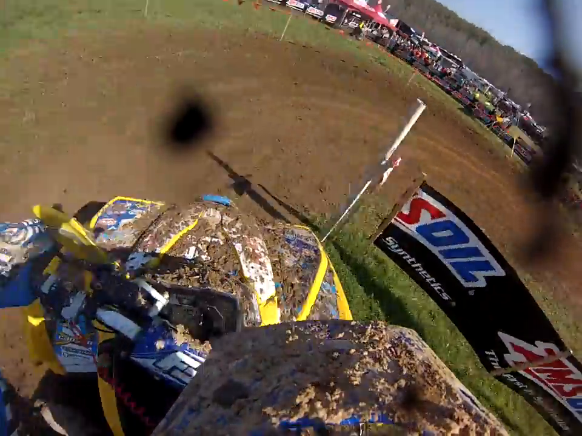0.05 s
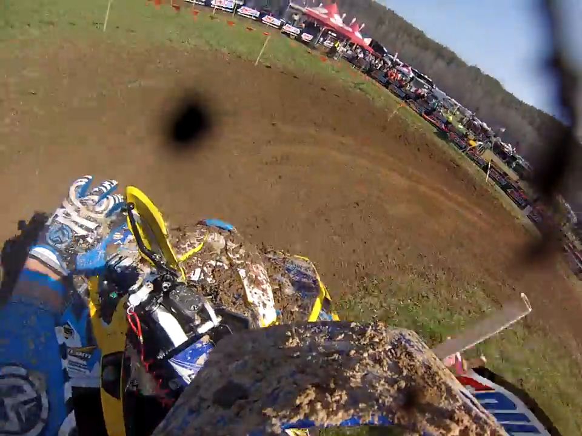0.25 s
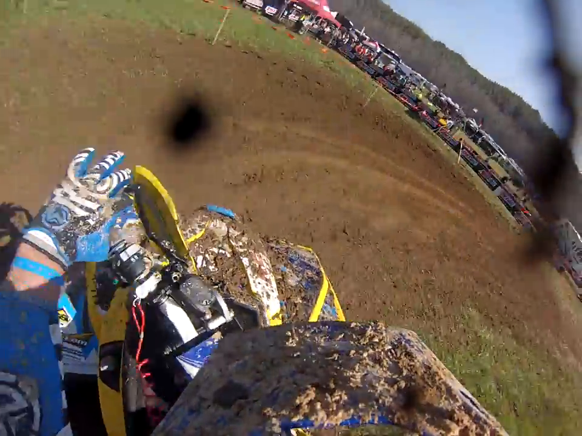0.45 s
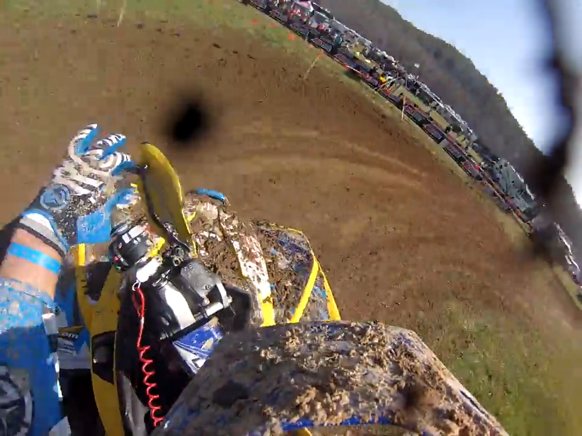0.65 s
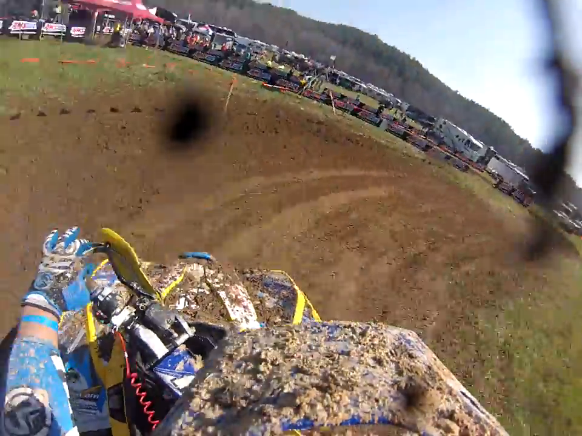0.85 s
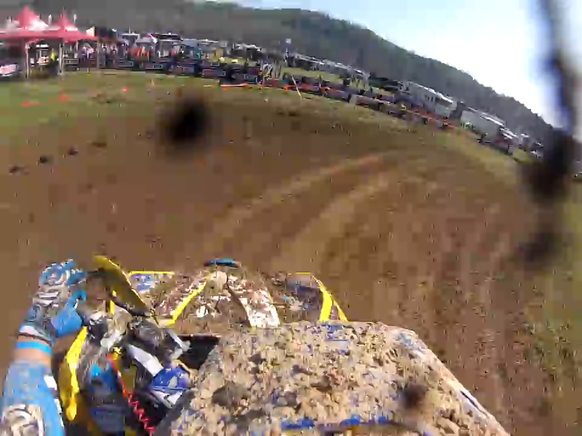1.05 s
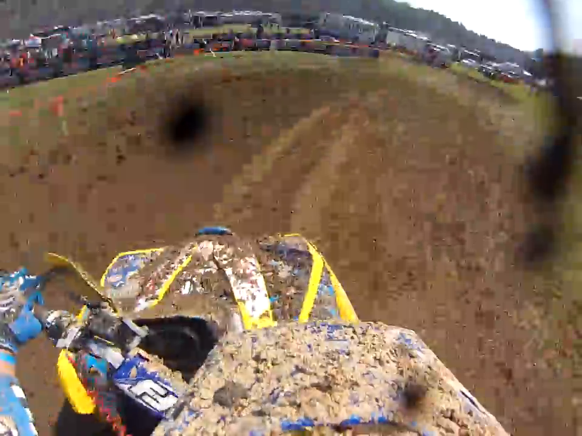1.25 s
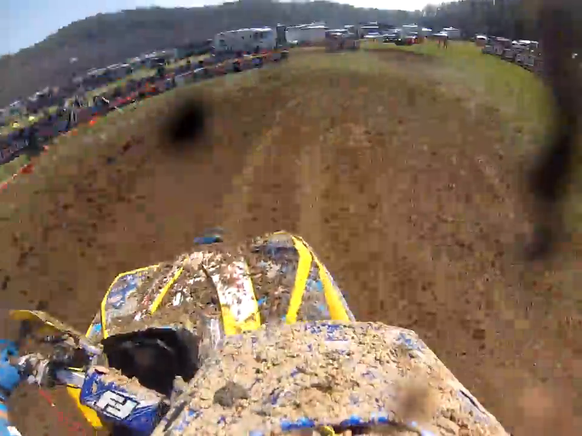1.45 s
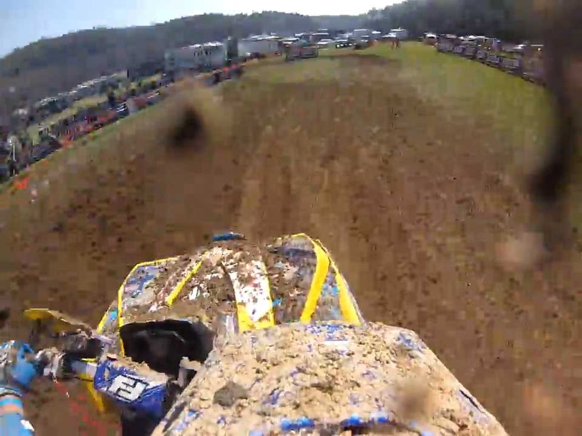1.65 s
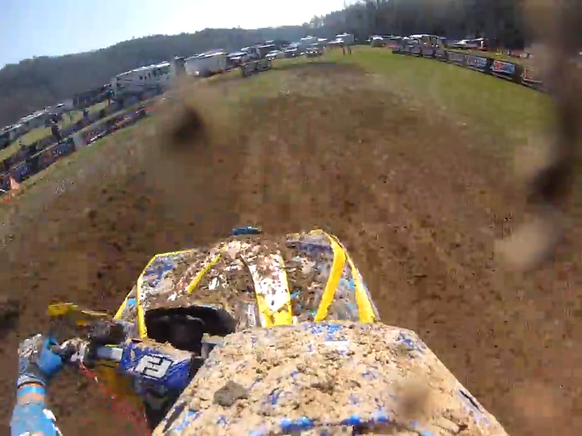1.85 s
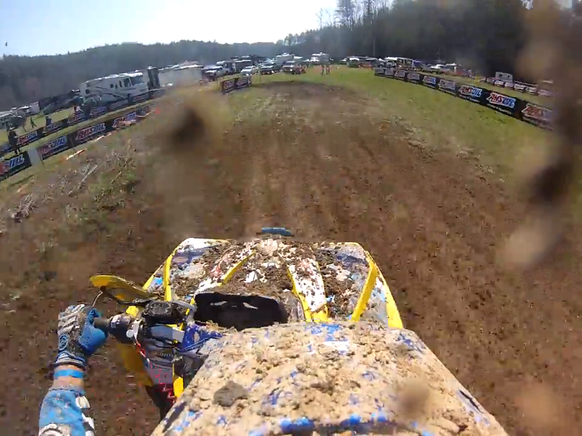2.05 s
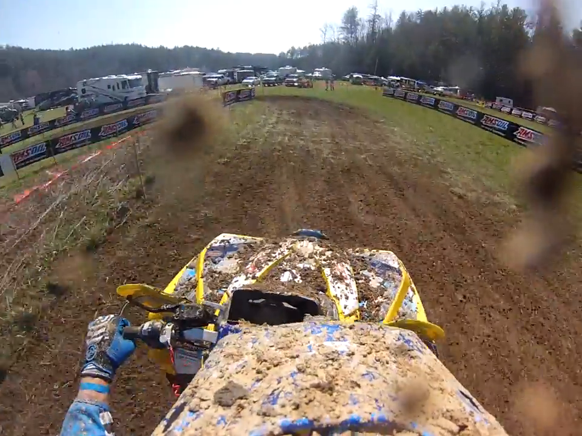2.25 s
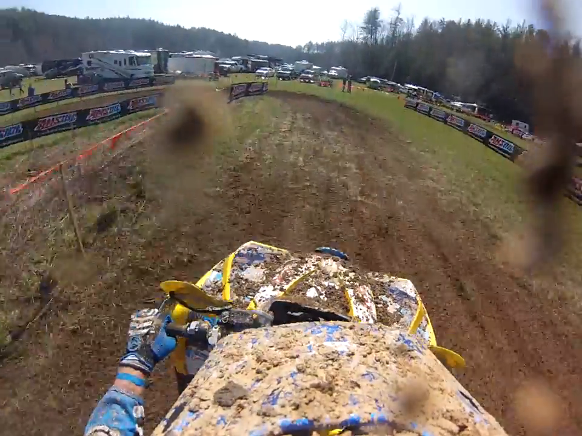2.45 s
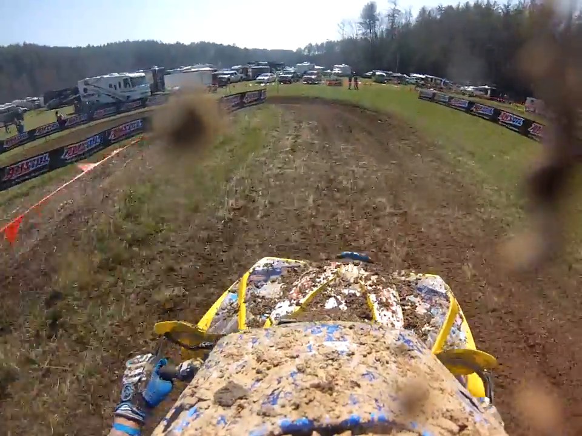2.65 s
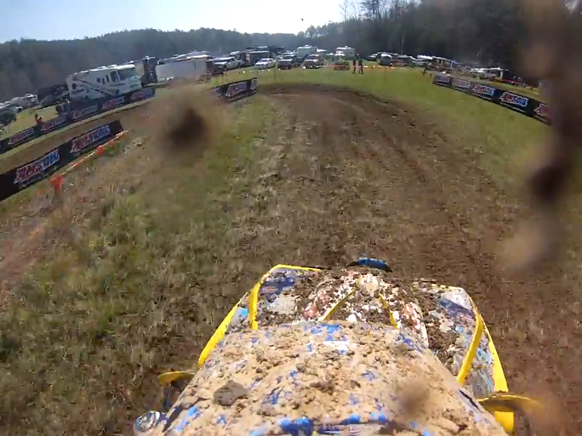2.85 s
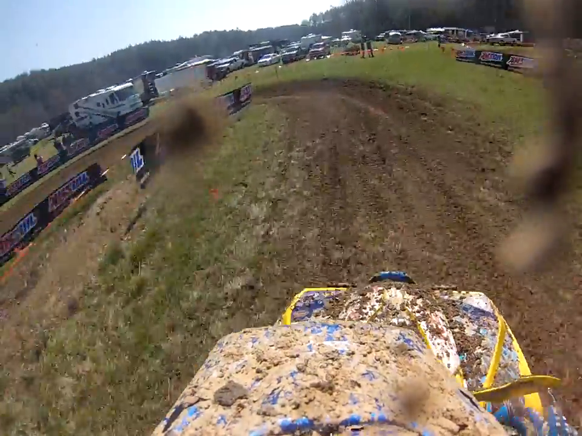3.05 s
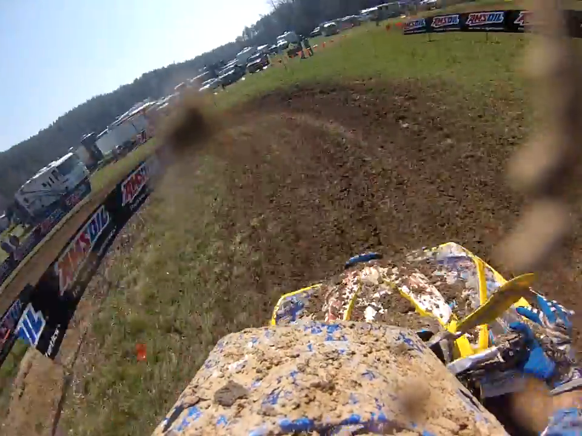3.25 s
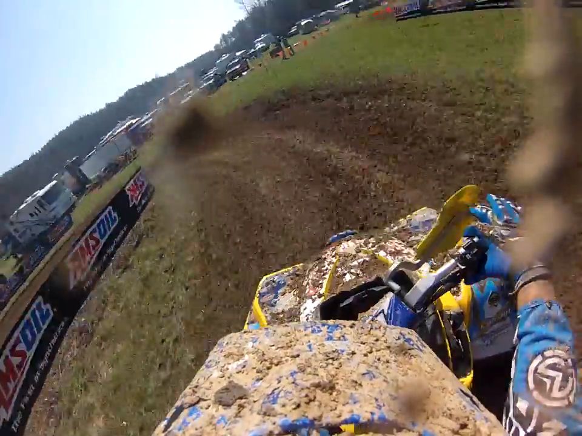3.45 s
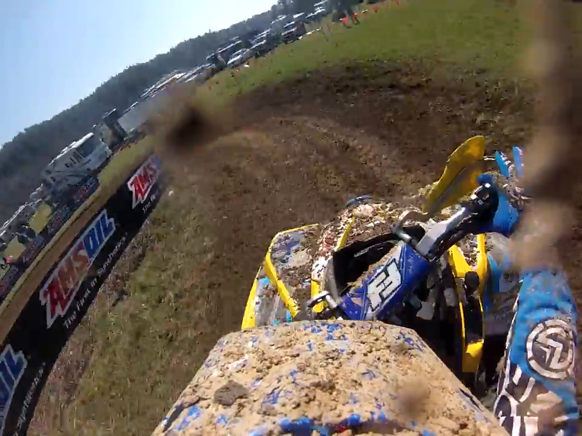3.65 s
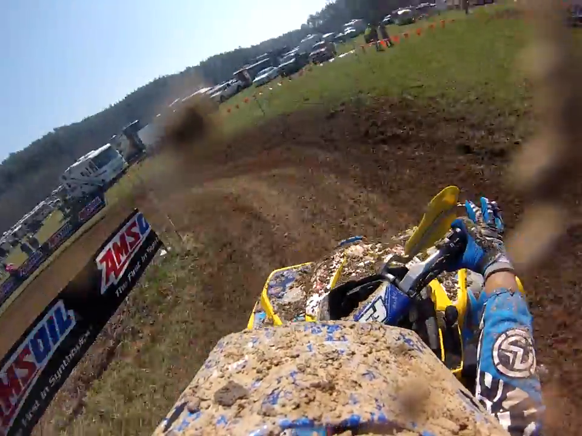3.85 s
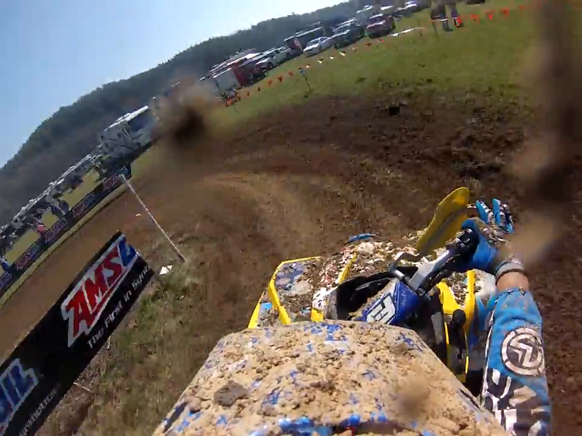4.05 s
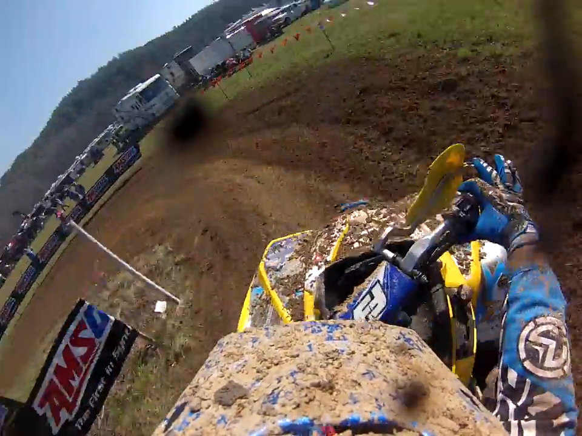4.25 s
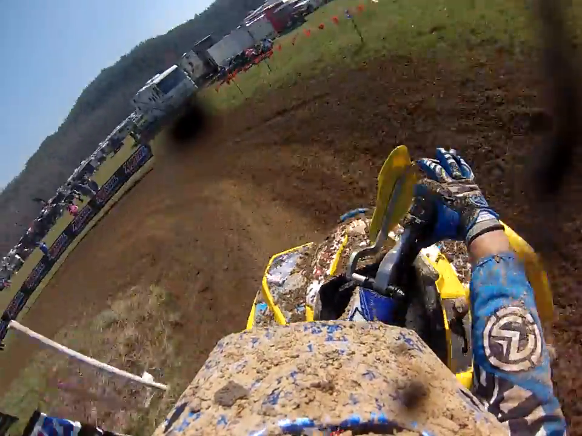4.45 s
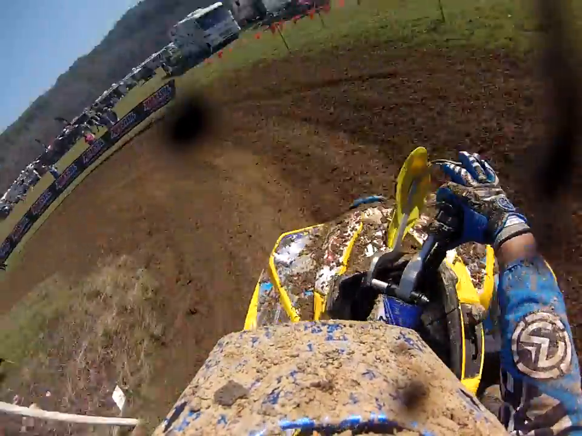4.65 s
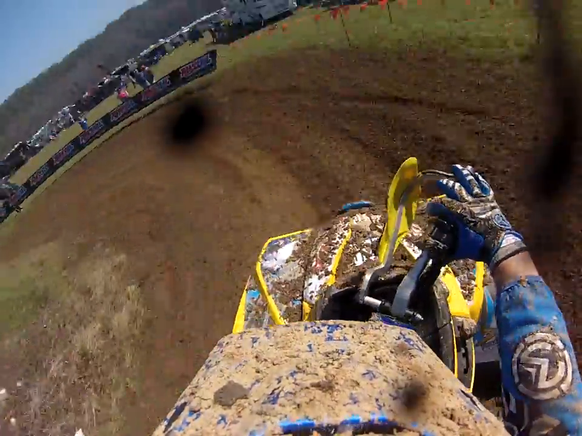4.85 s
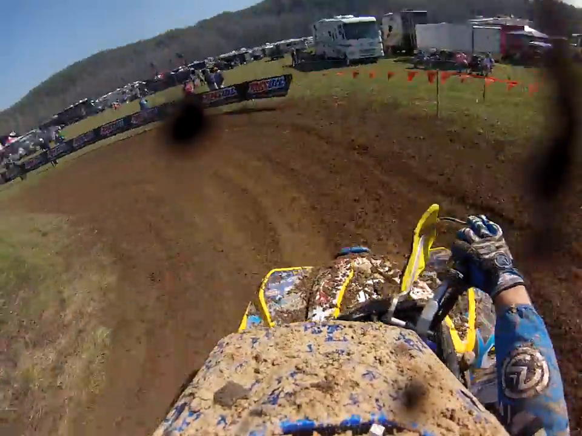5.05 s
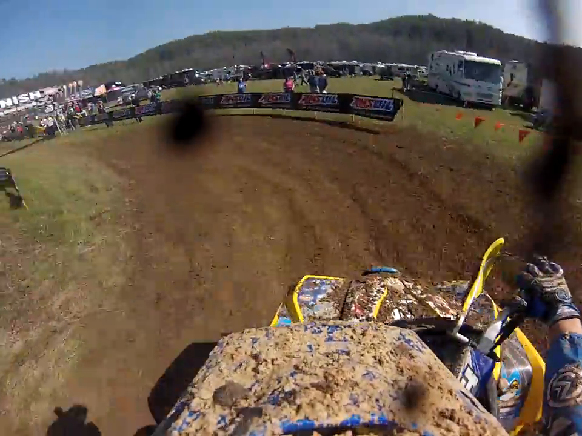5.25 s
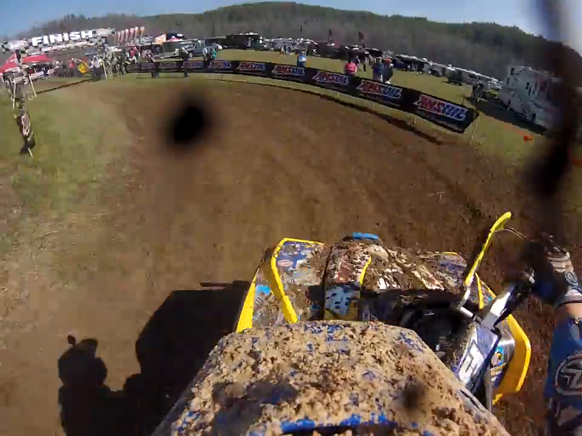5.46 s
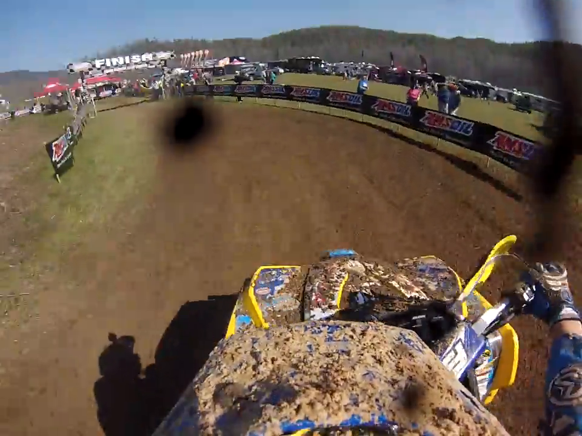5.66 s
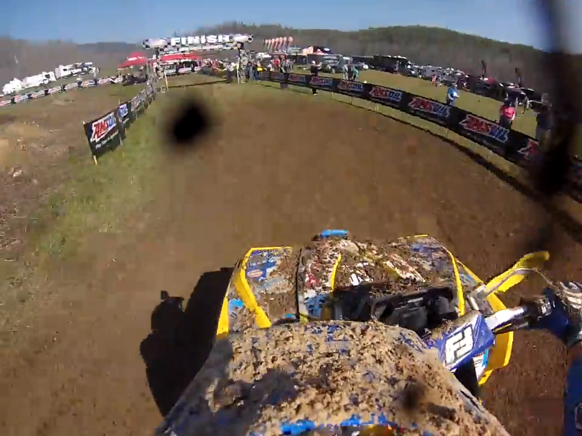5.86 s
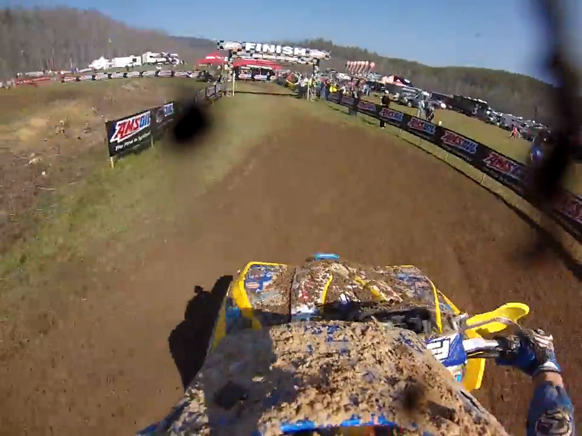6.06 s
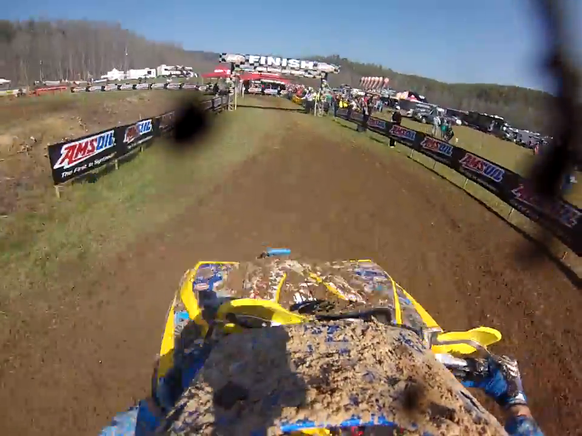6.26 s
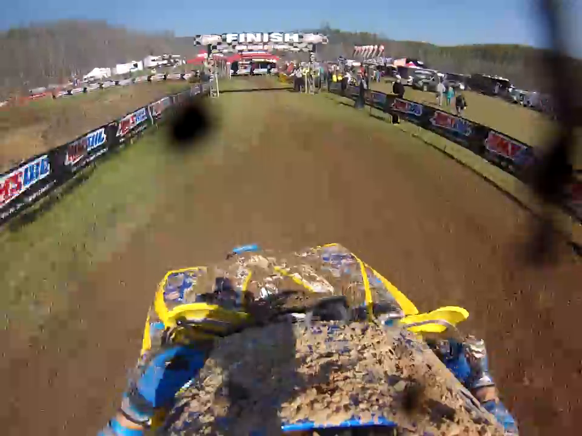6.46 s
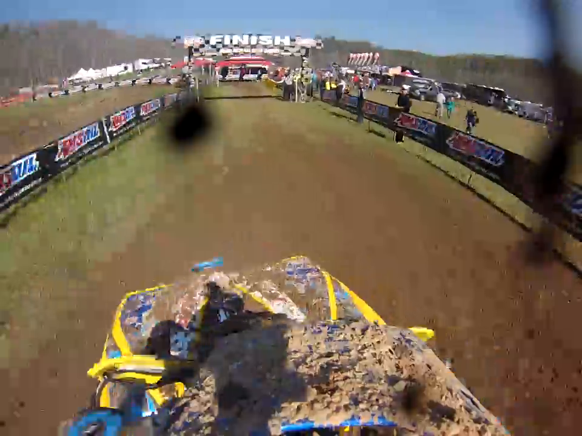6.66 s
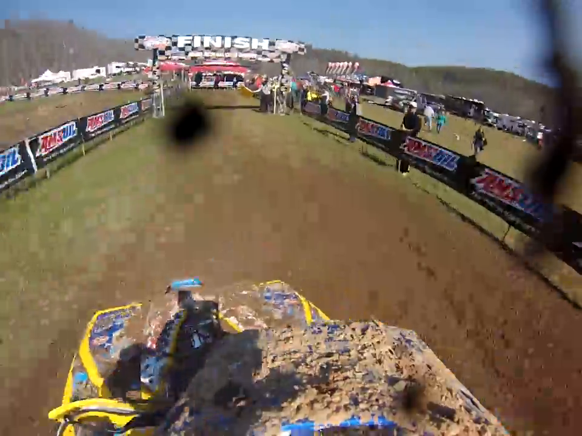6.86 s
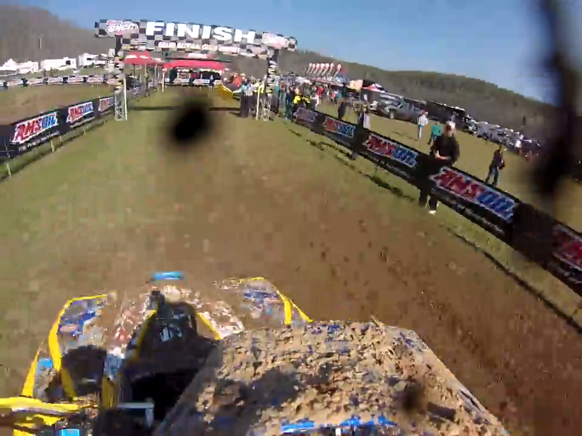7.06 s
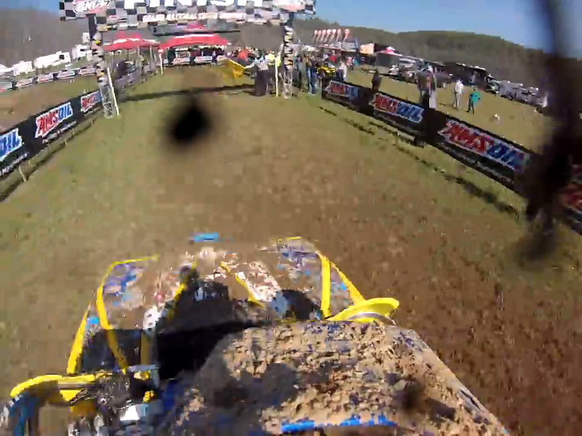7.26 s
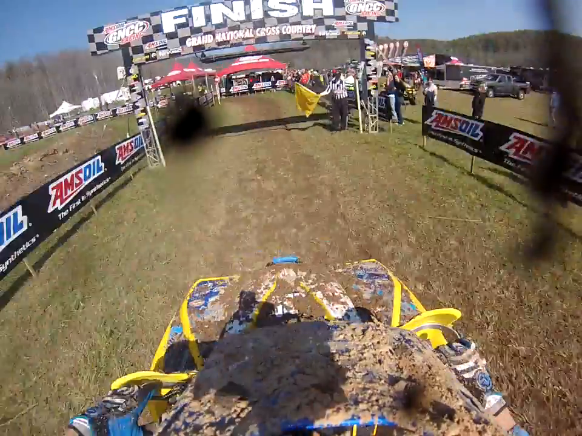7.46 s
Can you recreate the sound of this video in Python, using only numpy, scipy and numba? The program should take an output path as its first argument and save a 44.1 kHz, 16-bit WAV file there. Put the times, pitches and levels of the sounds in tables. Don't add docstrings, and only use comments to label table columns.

```python
import sys
import numpy as np
from scipy import signal
from scipy.fft import rfft, irfft, next_fast_len
from scipy.io import wavfile
from scipy.ndimage import uniform_filter1d
from numba import njit

SR = 44100
rng = np.random.default_rng(int(sys.argv[2]) if len(sys.argv) > 2 else 0)


def invert_db(level):
    return 10 ** (np.asarray(level, dtype=float) / 20)


def waveform_to_disk(signal):
    frames = np.transpose(np.atleast_2d(signal))
    scaled = np.clip(frames, -1, 1) * 32767
    samples = np.round(scaled).astype(np.int16)
    wavfile.write(sys.argv[1], SR, samples)


N = 330750

# centre in s, peak in dB, push length in s, duck of the sound after it in dB.
HARD_JOLTS = [
    (0.123, -4, 0.0113, -11),
    (0.634, -8, 0.011, -2),
    (1.44, -32, .01, -2.5),
    (1.727, -34, .01, -2.5),
    (2.815, -30, .01, -1.5),
    (2.984, -22, 0.0098, -2.5),
    (4.58, -29, 0.018, 0),
    (5.002, 4.5, 0.00495, -5.5),
    (5.536, -30, .01, -2),
    (6.102, -26, 0.0095, -2),
]
# centre in Hz, width in Hz, level in dB.
HOUSING_MODES = [(2064, 233, 6), (2427, 560, 3.5), (2864, 495, -1.5), (3873, 500, -14)]


def level(x, db):
    return x * invert_db(db) / np.sqrt(np.mean(x ** 2))


def even(x, span_s=0.21):
    return x / np.sqrt(uniform_filter1d(x ** 2, int(span_s * SR)) + 1e-12)


def ring(x, modes, order=1, sign=-1):
    size = next_fast_len(N + SR)
    f = np.arange(size // 2 + 1) * SR / size
    response = 0
    for k, (hz, width_hz, db) in enumerate(modes):
        damping = 1j * width_hz * f
        response = response + sign ** k * invert_db(db) * (damping / (hz ** 2 - f ** 2 + damping)) ** order
    return irfft(rfft(x, size) * response, size)[:N]


def curve(table):
    s, *columns = np.transpose(table)
    return [np.interp(np.arange(N) / SR, s, c) for c in columns]


def bumps(events):
    t = np.arange(N) / SR
    return sum(height * np.exp(-((t - s) / half_s) ** 2) for s, height, half_s in events)


def noise():
    return rng.standard_normal(N)


def walk(rate_hz):
    k = int(SR / rate_hz)
    held = np.repeat(rng.standard_normal(N // k + 1), k)
    return 1.5 * uniform_filter1d(uniform_filter1d(held, k), k)[:N]


def speed():
    # time in s, firing rate in Hz.
    crank = [(0, 26.87), (.27, 26.03), (.47, 37.9), (.65, 41.2), (.98, 44), (1.21, 52.65), (1.7, 65.04),
             (2.8, 67.02), (2.94, 53.72), (3.2, 42.07), (3.52, 37.55), (3.99, 26.39), (4.5, 25.2),
             (4.75, 38.1), (5.02, 43.82), (5.45, 58.4), (5.95, 65.4), (7.5, 65.7)]
    # centre in s, change in Hz, half length in s.
    surges = [(1.376, 0.71, 0.11), (1.782, -0.81, 0.093), (2.288, -0.44, 0.046), (2.548, 0.84, 0.099),
              (2.719, -0.79, 0.058), (3.276, -0.91, 0.086), (5.601, 0.51, .12), (6.24, .4, .12),
              (6.455, 0.71, 0.062), (6.88, -0.88, 0.17), (7.372, 0.44, 0.13)]
    hz = uniform_filter1d(curve(crank)[0], int(.05 * SR)) + bumps(surges)
    full_hz = 66
    return hz, np.log2(hz / full_hz)


def roar():
    # frequency in Hz, density in dB per Hz.
    spectrum = [(29, -49), (50, -32), (91, -2.5), (247, -7.5), (389, -10), (797, -28.5), (1450, -14),
                (1750, -25), (2450, -25), (2960, -31), (15000, -63)]
    f = np.maximum(np.arange(N // 2 + 1) * SR / N, 1)
    gusts = invert_db(1.3 * walk(6))
    hz, db = np.transpose(spectrum)
    shape = invert_db(np.interp(np.log(f), np.log(hz), db))
    return level(irfft(rfft(noise()) * shape, N), -33.0) * gusts


def ticks():
    # start in s, peak in dB, brightness in dB.
    knocks = [(2.9744, -32, -23), (3.3375, -38, -22), (4.0087, -32.5, -27), (4.0406, -39, -19),
              (4.07, -27, -32), (4.098, -29, -26), (4.123, -32, -32), (4.2265, -24, -37),
              (4.2538, -22, -32), (4.2794, -21, -32), (4.3055, -20, -29), (4.3301, -29, -7),
              (4.3548, -25, -8), (4.4089, -32, -5), (4.4256, -38, -8), (4.4458, -38, -24),
              (4.6025, -40, -22), (4.8984, -24, -4), (4.9701, -48, -16), (4.9954, -24, -0.5)]
    # centre in Hz, width in Hz, level in dB.
    knock_modes = [(2070, 250, 2), (2460, 230, 6), (3250, 330, -8), (4020, 310, -19)]
    low, high = np.zeros(N), np.zeros(N)
    k = np.arange(400)
    burst = np.exp(-k / 64.0) * (1 - np.exp(-k / 7.4))
    for s, db, bright_db in knocks:
        i = int(s * SR)
        hit = burst * np.sign(rng.standard_normal(400))
        low[i:i + 400] += invert_db(db + 15.0) * hit
        high[i:i + 400] += invert_db(db + bright_db + 10) * hit
    return ring(low, knock_modes, order=2) + ring(high, [(5300, 1180, -1.0)], order=2)


def mount():
    # centre in Hz, width in Hz, level in dB.
    mount_modes = [(39, 11.2, -3.5), (17.5, 27, -7)]
    # centre in s, peak in dB, half length in s.
    ruts = [(0, -6, 0.012), (0.3, -19, 0.064), (0.536, -19.5, 0.19), (1.266, -20.5, 0.13),
            (1.453, -15, 0.027), (1.57, -25, .03), (1.73, -11, 0.019), (2.76, -22, .025),
            (2.847, -14.5, 0.025), (2.996, -21.5, 0.078), (3.127, -19, .04), (3.274, -16, .06),
            (3.72, -18.5, 0.15), (4.34, -34, 0.045), (4.593, -6, 0.034), (4.735, -13, 0.046),
            (5.064, -24, 0.048), (5.33, -24, 0.044), (5.537, -21, 0.029), (6.098, -16, 0.022),
            (6.866, -21, .04), (7.059, -24, 0.041), (7.208, -22, .04), (7.38, -25, .05)]
    ground_db, ground_slope_db = -31, -4.5
    ground = invert_db(ground_db + ground_slope_db * speed()[1])
    ground = ground + bumps([(s, invert_db(db), half_s) for s, db, half_s in ruts])
    shake = even(ring(noise(), mount_modes, order=2), 0.079) * ground
    push = bumps([(s, -invert_db(db), 0.62 * length_s) for s, db, length_s, _ in HARD_JOLTS])
    return shake + push + 2.05 * ring(push, [(44, 5.6, 0.5)])


def duck():
    t = np.arange(N) / SR
    in_s, hold_s, hold_s_per_db = 0.0053, 0.022, 0.0433
    total_db = 0
    for s, _, _, db in HARD_JOLTS:
        after = np.maximum(t - s, 0)
        recovery = np.exp(-(after / (hold_s - hold_s_per_db * db)) ** 2)
        total_db = total_db + db * (1 - np.exp(-after / in_s)) * recovery
    return invert_db(total_db)


def strokes(turns, size):
    at = np.flatnonzero(np.diff(np.floor(turns)) > 0)
    late = (turns[at + 1] % 1) / (turns[at + 1] - turns[at])
    pulses = np.zeros(N + 1)
    pulses[at] += size[at] * late
    pulses[at + 1] += size[at] * (1 - late)
    return pulses[:N]


def silencer_thump(exhaust, piston, hz, frame_db, body_db):
    # firing rate in Hz, share -1..1.
    half_stroke = [(26, -0.7), (39, 0.29), (52, -0.059), (66, 0.0023)]
    # centre in Hz, width in Hz, level in dB.
    low_modes = [(71.8, 27, 6.5), (126.7, 71, 2.5), (158.6, 51.4, 2.5)]
    upper_modes = [(215, 36.5, -2.5), (259.6, 22.5, -4.5), (323.5, 65, -2.5)]
    beat = -exhaust - np.interp(hz, *np.transpose(half_stroke)) * piston
    boom = even(ring(beat, low_modes, order=2) - invert_db(body_db) * ring(beat, upper_modes, order=2))
    hum = np.sin(2 * np.pi * (3 * np.cumsum(hz) / SR + 0.35))
    return even(boom + invert_db(frame_db) * hum)


def pipe_note(blow, gas, share, upper_db):
    # centre in Hz, width in Hz, level in dB.
    main_modes = [(324, 22.3, 5), (406.4, 37, 0.5), (581.5, 57, -6), (693, 28, -8), (772.3, 26.3, -4.5),
                  (985, 123, -8.5)]
    upper_modes = [(439, 25, 1), (515, 35, -9)]
    note = even(ring(blow, main_modes) - invert_db(upper_db) * ring(blow, upper_modes))
    return note + 0.38 * share * even(ring(gas, main_modes + [(690, 590, 0)]))


def housing_ring(blow, gas, share, lower_db):
    # centre in Hz, width in Hz, level in dB.
    main_modes = [(1419, 113, 9), (1434, 84, -18.5)]
    lower_modes = [(1144.4, 95, 0.56)]
    skirt_modes = [(1180, 245, 2), (1150, 44, -14), (1404, 77, -12.5)]
    tone = even(ring(blow, main_modes, order=2) - invert_db(lower_db) * ring(blow, lower_modes, order=2))
    return np.sqrt(1 - share) * tone + np.sqrt(share) * even(ring(gas, main_modes + skirt_modes))


def gas_rasp(gas, grit, blast):
    rough = gas * (1 + 0.13 * grit) * invert_db(4.5 * walk(5.5))
    return even(ring(rough, HOUSING_MODES)) + 0.39 * even(ring(blast, HOUSING_MODES[:3], order=2))


def thin_walls(gas, gate, grit, crack, gas_db, crack_db):
    # centre in Hz, width in Hz, level in dB.
    wall_modes = [(5060, 483, 3.5), (6840, 1100, -31.5), (7650, 310, -9.5), (9000, 3000, -22),
                  (11400, 5700, -24)]
    bright_db = -3.5
    leak = even(ring(gate * (1 + 0.46 * grit) * noise(), [(5060, 6000, 0.5)], order=3))
    snap = even(ring(crack, wall_modes + HOUSING_MODES[3:], order=2))
    hiss = even(ring(gas * (1 + 0.7 * grit), wall_modes, order=2))
    return invert_db(gas_db - 17.5) * leak + invert_db(crack_db) * snap + invert_db(gas_db + bright_db - 14.5) * hiss


def engine():
    # time in s, throttle (0 shut, 1 open, at times a little beyond),
    # wheelspin 0-1.
    rider = [(0, .15, 1), (.24, .1, 1), (.33, 1.05, 0.5), (1.05, 1, 0.55), (1.25, .85, 0.06),
             (1.65, 1, 0.53), (2.8, 0.99, 0.05), (2.85, 0.11, 0.01), (3.5, .15, 1), (4.1, -.2, 0),
             (4.42, .05, 0.65), (4.54, 0, 0.43), (4.66, 0.53, .2), (4.95, 0.95, 0.37), (5.17, 1.12, 0.53),
             (5.62, .85, .2), (6.55, .95, 1), (7.5, 0.86, 0.55)]
    # time in s, head turned to the engine -1.2..1, weight on the frame -1..1, echo lag
    posture = [(0, -.8, 0.75, 0.38, 1.3), (.36, -0.31, -0.11, 0.32, -1.44), (.95, 0.21, -0.39, 0.36, 0.13),
               (1.15, -0.5, 0.42, 0.25, -0.86), (1.45, 0.23, 0.15, 0.36, -0.65),
               (1.85, -0.12, -0.87, 0.342, -0.93), (2.05, -0.45, -0.65, .33, -0.18),
               (2.35, -0.83, 0.36, 0.35, 0.077), (2.8, -0.85, -0.051, 0.32, 0.23),
               (3.0, -1.2, 0.67, .29, -0.66), (4.5, -0.64, 0.35, 0.27, -0.19),
               (4.96, 0.089, -0.31, .29, 0.83), (5.17, 0.27, 0.17, 0.36, 0.39),
               (5.45, 0.42, 0.52, 0.4, 0.29), (5.68, 0.12, 0.41, 0.3384, 1.3), (6.2, 0.73, 0.25, 0.33, 0.5),
               (6.6, 0.61, 0.17, 0.34, .35), (7.5, -0.74, -0.45, 0.34, -0.26)]
    hz, octaves = speed()
    throttle, spin = curve(rider)
    head, weight, lag, chin = curve(posture)
    shut = np.clip(1 - throttle, -.15, 1.3)

    def law(db, slope_db, shut_db, shut_slope_db):
        return db + slope_db * octaves + shut * (shut_db + shut_slope_db * octaves)

    thump_db = law(-16, 1.5, -0.5, 4.5) + 1 * weight
    pipe_db = law(-16.5, 8, -9, 12) - 3 * chin
    ring_db = law(-16.5, 16, -9.5, -0.5) + 3.5 * chin
    gas_db = law(-29.5, 18.5, -17.5, -11) + 10 * spin
    frame_db = law(-9, 10, 3, -7.5) + 14.5 * weight
    body_db = law(-1, -6, -2, 12) + 4.5 * weight
    crack_db = gas_db - 19.5 - 13 * octaves * throttle
    lower_db = 18 * head
    on_song_hz, on_song_span_hz, on_song_db = 59, 2.9, 12
    upper_db = 4 * head - 2.5 + on_song_db * np.exp(-((hz - on_song_hz) / on_song_span_hz) ** 2)
    clean, lug, slip, closed = .14, .45, .3, .84
    share = np.clip((1 - shut) * (clean - lug * octaves + slip * spin ** 2) + shut * closed, 0, .9)

    scatter_db = .85
    start_turn, intake_turn = .9, .58
    turns = start_turn + np.cumsum(hz) / SR + 0.00037 * scatter_db * walk(30)
    exhaust = strokes(turns, invert_db(scatter_db * noise()))
    piston = strokes(turns - .5, invert_db(scatter_db * noise()))
    intake = strokes(turns - intake_turn + 0.018 * walk(1.5), invert_db(scatter_db * noise()))
    echo_share = np.clip(0.47 + 0.17 * octaves, .25, 1)
    blast = exhaust + strokes(turns - lag, echo_share) + 0.077 * strokes(turns - 2 * lag, echo_share ** 2)
    blow = 0.41 * intake - blast

    since_s = (turns % 1) / hz
    puff = invert_db(5.5 * rng.standard_normal(N // 100))[turns.astype(int)]
    blow_down = puff * since_s / (since_s + 0.00075) * np.exp(-since_s / 0.0025)
    gate = 0.43 + blow_down + 0.63 * np.exp(-((turns - .55) % 1) / 0.96)
    gas = gate * invert_db(0.52 * walk(30)) * noise()
    grit = uniform_filter1d((rng.random(N) < .0012) * rng.exponential(15.0, N), size=24)
    crack = np.sqrt(puff) * np.exp(-since_s / 0.003) * noise()

    body = silencer_thump(exhaust, piston, hz, frame_db, body_db) * invert_db(thump_db)
    body = body + pipe_note(blow, gas, share, upper_db) * invert_db(pipe_db)
    body = body + housing_ring(blow, gas, share, lower_db) * invert_db(ring_db)
    body = body + gas_rasp(gas, grit, blast) * invert_db(gas_db)
    body = signal.sosfilt(signal.butter(3, 4800, fs=SR, output="sos"), body)
    return body + thin_walls(gas, gate, grit, crack, gas_db, crack_db)


def scene():
    gain = duck()
    return (roar() * np.sqrt(gain) + ticks() + mount() + engine() * gain)[None, :]


@njit
def gain_control(x, top, attack, release, power):
    y, envelope = np.empty(len(x)), 0.
    for i in range(len(x)):
        a = abs(x[i])
        envelope += (a - envelope) * (attack if a > envelope else release)
        y[i] = x[i] * min(1., top / (envelope + 1e-9)) ** power
    return y


def band_limit(x):
    return signal.sosfilt(signal.butter(12, 15710, fs=SR, output="sos"), x)


def record(dry):
    held = gain_control(dry[0], 0.59, 0.013, 0.00076, 1.5)
    held = np.tanh(0.52 * held) / 0.56 + invert_db(-68.5) * noise()
    top_hz = 15250
    held = signal.sosfilt(signal.cheby1(6, .5, top_hz, fs=SR, output="sos"), held)
    return band_limit(held[None, :])


dry = scene()
out = record(dry)
waveform_to_disk(out)
```